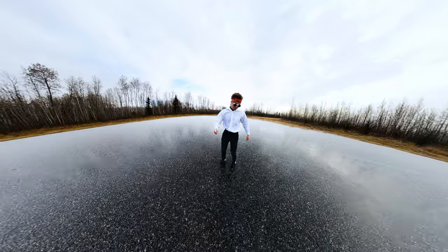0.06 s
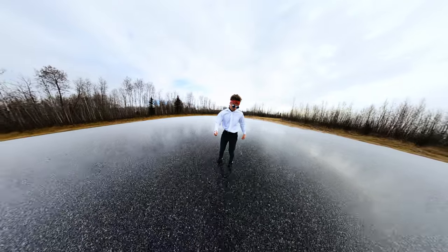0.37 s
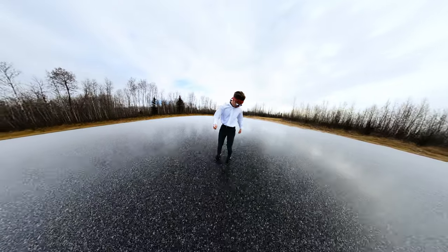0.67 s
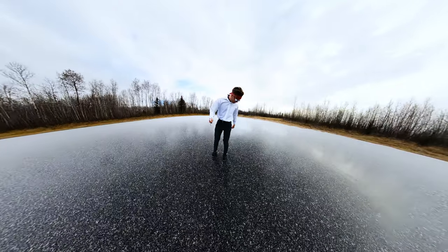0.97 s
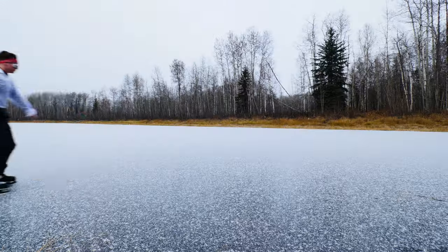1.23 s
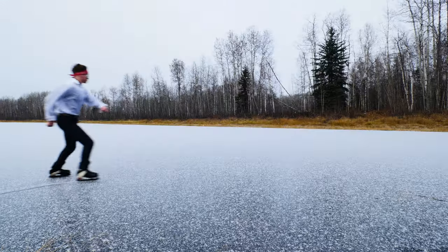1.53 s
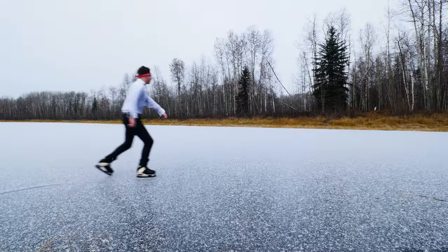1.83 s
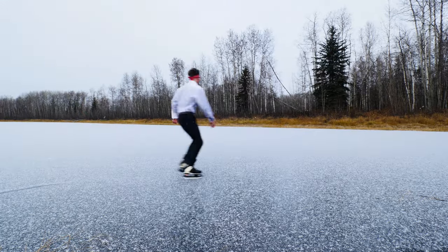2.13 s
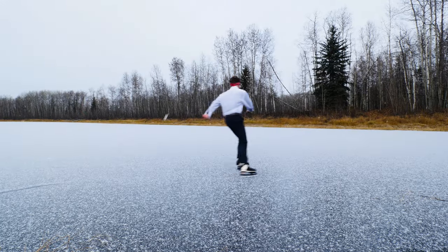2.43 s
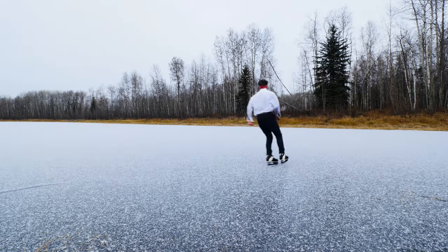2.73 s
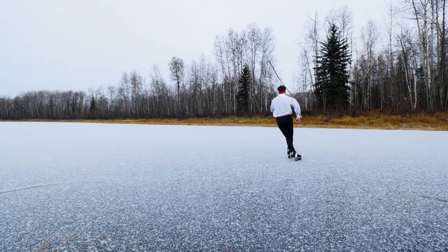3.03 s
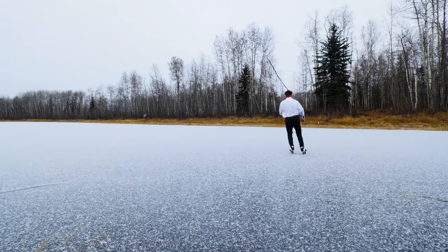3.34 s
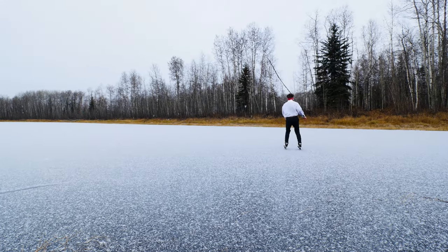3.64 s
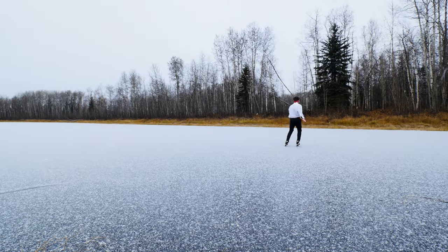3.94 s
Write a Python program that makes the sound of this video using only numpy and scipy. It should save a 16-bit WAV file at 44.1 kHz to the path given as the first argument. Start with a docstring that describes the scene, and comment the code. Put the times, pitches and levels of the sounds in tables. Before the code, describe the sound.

Ice skates scrape and tick sharply on a frozen lake, heard just above the blades. Then, from ice level, the skater passes left to right, the thin ice answering with falling chirps and low thuds over light wind.

```python
"""Sharp ticks and scraping of skates on thin lake ice, from just above the blades (mono); then, heard from
the ice, the skater passes left to right. Each tiny crack under a blade runs through the sheet, treble
first, and arrives as a falling chirp that settles on the ice's own note: the farther, the longer the glide.
Strokes add crack swarms and scrape; low thuds in the ice, light wind and a faint hum lie beneath."""
import sys
import numpy as np
from scipy import signal
from scipy.fft import rfft, irfft, next_fast_len
from scipy.io import wavfile
from scipy.ndimage import map_coordinates

SR = 44100
rng = np.random.default_rng(int(sys.argv[2]) if len(sys.argv) > 2 else 0)


def bounce(signal):
    """Save signal as a 16-bit WAV file at the path given by the first command-line argument."""
    frames = np.transpose(np.atleast_2d(signal))
    limited = np.clip(frames, -1, 1)
    pcm = np.round(limited * 32767).astype(np.int16)
    wavfile.write(sys.argv[1], SR, pcm)


N = 176400
TIME = np.arange(N) / SR

# close cracks: t/s, level/dB, glide/ms
CLOSE_CRACKS = [(0.0295, 1, 0.6), (0.128, -16, 1.6), (0.141, -20, 3.1), (0.172, -17.5, 2.8),
                (0.199, -13, 2.2), (0.2201, -1, 0.39), (0.289, -11, .6), (0.301, -7.5, 0.62),
                (0.3174, -6.5, 0.35), (0.3276, -11, 0.71), (.3358, -21, 1.2), (0.358, -10.5, 0.68),
                (0.3876, -11, 3.1), (0.403, -16, 1.8), (0.4146, -14.5, 1.3), (0.4318, -15, 1.3),
                (0.4412, -20, 3.2), (0.468, -18.5, 2.8), (.479, -18, 2.4), (0.5052, -2, 0.55),
                (0.622, -20, 5.6), (0.6608, -6, 0.85), (0.695, -3, 0.38), (.782, -11, 1.65),
                (0.8419, -3, 0.95), (.939, -6.5, 0.26), (0.96, -7.5, 0.21), (.972, -20, 1),
                (.988, -18, 1.3), (1.009, -1, 0.63), (1.0221, -4, 0.56), (1.0313, -1.5, 0.28)]
# close strokes: t/s, length/s, level/dB, fade/(dB/s)
CLOSE_STROKES = [(0.213, 0.087, -27.5, 17), (0.321, 0.091, -36.5, 55), (0.504, 0.072, -30.5, 64),
                 (0.657, 0.011, -22.5, 250), (0.686, 0.15, -31, 29), (0.838, 0.01, -24, 200),
                 (0.996, 0.12, -27, 37)]
# close blade scrape: f/Hz, level/dB
CLOSE_SCRAPE_EQ = [(300, -57), (800, -19), (1300, -1), (2200, -0.5), (3500, -4.5), (5500, -2.5), (7500, -5),
                   (9500, -17), (12000, -27.5), (15500, -46)]
# wind on the carried microphone: f/Hz, level/dB
RUMBLE_EQ = [(12, 0.5), (27, -4), (45, -12), (80, -29), (200, -55), (600, -90)]
# wind in the shore trees: f/Hz, level/dB
TREES_EQ = [(25, -55), (60, -39), (110, -7), (175, 0), (240, -1.5), (500, -8), (1000, -4.5), (4000, -29.5),
            (15000, -38)]
# low thuds in the ice: t/s, level/dB
THUDS = [(0.219, -34), (0.295, -24), (0.541, -30), (1.104, -27.5), (1.239, -27), (1.643, -29), (1.905, -29),
         (2.026, -30), (2.129, -30), (2.159, -28), (2.313, -22.5), (2.384, -31), (2.956, -24),
         (3.151, -23.5), (3.353, -29), (3.411, -20.5), (3.798, -35), (3.881, -29)]
# low thud in the ice: f/Hz, level/dB
THUD_EQ = [(50, -64), (120, -15), (220, -0.5), (380, -1), (600, -8.5), (900, -1), (1500, -25), (12000, -50)]
# skater's path: t/s, distance/m, left minus right/dB
PATH = [(1.14, 8.3, 13), (1.5, 12.8, 12), (1.84, 11.2, 9.5), (1.91, 5, 10), (2.08, 6.7, 6.5),
        (2.22, 2.75, -3.5), (2.32, 5.3, 0.5), (2.42, 6.1, -13), (2.68, 10.53, -10.5), (3.14, 12.8, -19.5),
        (3.42, 11.95, -14), (3.72, 12, -5), (3.88, 16.5, -12.5)]
# cracks of the pass: t/s, level/dB
PASS_CRACKS = [(1.186, -21), (1.203, -16.5), (1.234, -13), (1.268, -23), (1.287, -24), (1.302, -22),
               (1.329, -18), (1.344, -24), (1.363, -17), (1.388, -18), (1.416, -17), (1.426, -18),
               (1.448, -22), (1.459, -16), (1.472, -21), (1.49, -19.5), (1.506, -18), (1.523, -20),
               (1.563, -19.5), (1.6, -17.5), (1.611, -18.5), (1.629, -21), (1.653, -23), (1.705, -20.5),
               (1.745, -20.5), (1.767, -20), (1.791, -22), (1.857, -17.5), (1.898, 1), (1.962, -17),
               (1.978, -14.5), (2.043, -14), (2.087, -16), (2.122, -16.5), (2.2108, -9), (2.2406, -11),
               (2.288, -9.5), (2.3068, -3), (2.319, -6), (2.345, -9.5), (2.386, -16), (2.401, -13),
               (2.413, -11), (2.457, -7.5), (2.498, -10.5), (2.505, -12), (2.545, -21), (2.693, -19.5),
               (2.713, -20), (2.757, -22), (2.774, -23.5), (2.821, -23.5), (2.927, -20.5), (2.953, -17),
               (2.988, -19.5), (3.023, -22.5), (3.044, -22), (3.078, -22), (3.101, -24), (3.1415, -0.5),
               (3.187, -18), (3.216, -14.5), (3.238, -19), (3.279, -13), (3.342, -18), (3.403, -2),
               (3.471, -15), (3.53, -20), (3.568, -24), (3.589, -21.5), (3.614, -22), (3.641, -20.5),
               (3.696, -19.5), (3.719, -18.5), (3.867, -0.5), (3.918, -17), (3.985, -20)]
# strokes of the pass: t/s, length/s, swarm/dB, scrape/dB, fade/(dB/s)
PASS_STROKES = [(1.158, 0.16, -28.5, -39.5, 4), (1.916, 0.22, -28.5, -28.5, 24),
                (2.302, 0.18, -12.5, -19, 82), (2.487, 0.13, -30, -31.5, 64), (3.145, 0.073, -11, -24, 122),
                (3.339, 0.12, -18.5, -28, 31), (3.546, 0.26, -32, -46, 3), (3.861, 0.18, -21.5, -28.5, 5)]
# gliding blades: t/s, hiss/dB, swarm/dB
GLIDING = [(1.14, -33, -23.5), (1.38, -41.5, -35.5), (1.62, -36, -32), (1.83, -38, -50), (1.895, -28, -28),
           (2.24, -39.5, -34.5), (2.4, -35, -31), (2.66, -46.5, -35.5), (2.88, -45, -39),
           (3.1, -46.5, -37.5), (3.45, -41.5, -26.5), (3.82, -49.5, -59), (4, -46, -26)]
# singing sheet: f/Hz, level/dB
SINGING_EQ = [(700, -21), (980, -0.5), (1100, 8.5), (1250, -11), (2000, -5), (4500, -32)]
# passing blade scrape: f/Hz, level/dB
PASS_SCRAPE_EQ = [(150, -30), (350, -1.5), (700, 5), (1200, 5), (2000, 3), (3500, 0), (4700, -17.5),
                  (6200, -7), (8000, -18), (10000, -13), (12500, -17), (15500, -36)]
# gliding hiss: f/Hz, level/dB
HISS_EQ = [(500, -4), (1500, 6.5), (3200, 0.5), (4800, -8), (6500, -2.5), (8000, -6.5), (10000, 0),
           (12500, -6.5), (15500, -21)]
# ice spray from a biting edge: t/s, length/s, level/dB, fade/(dB/s)
SPRAYS = [(1.136, 0.17, -40, 50), (2.304, 0.44, -35.5, 56)]
# ice chips flicked off the blades: t/s, level/dB
CHIPS = [(1.6165, -22), (1.734, -22), (2.1096, -17), (1.898, -10), (2.305, -6.5), (2.453, -19),
         (2.954, -23)]

ICE_NOTE_HZ, CLOSE_NOTE_HZ, BLADE_HZ = 1064, 1261, 9720
GLIDE_MS_PER_M, SWELL_PER_M, NEAR_M = 1.042, 0.035, 1.8
ONSET_HZ, SWEEP_POWER, NOTE_SAG = 9020, 0.6044, 0.041
PASS_START_S, TOP_HZ = 1.137, 15700


def amp(db):
    """dB to gain."""
    return 10 ** (np.asarray(db) / 20)


def unit(x):
    """Scale to rms 1."""
    return x / np.sqrt(np.mean(x ** 2) + 1e-20)


def curve(rows, column):
    """Table column, interpolated per sample."""
    rows = np.array(rows)
    return np.interp(TIME, rows[:, 0], rows[:, column])


def filtered(x, response):
    """Apply the gain response(hz)."""
    size = next_fast_len(N + 8192)
    return irfft(rfft(x, size) * response(np.fft.rfftfreq(size, 1 / SR)), size)[..., :N]


def coloured(x, eq):
    """Apply an EQ table; rms 1."""
    knots_hz, db = np.transpose(eq)
    return unit(filtered(x, lambda hz: amp(np.interp(np.log(hz + 1), np.log(knots_hz + 1), db))))


def ring(x, centre_hz, half_width_hz):
    """One resonance; rms 1."""
    return unit(filtered(x, lambda hz: 1 / (1 + ((hz - centre_hz) / half_width_hz) ** 2)))


def wobble(rate_hz):
    """Smooth random curve, knots at rate_hz."""
    return map_coordinates(rng.standard_normal(int(N * rate_hz / SR) + 4), [TIME * rate_hz])


def noise(shared):
    """Stereo white noise; shared: power fraction common to both sides."""
    return np.sqrt(shared) * rng.standard_normal(N) + np.sqrt(1 - shared) * rng.standard_normal((2, N))


def pan(db):
    """Constant-power gains for left minus right in dB."""
    gains = amp(np.array([db, -db]) / 2).reshape(2, -1)
    return gains / np.sqrt(np.mean(gains ** 2, axis=0))


def add(out, t_s, sound):
    """Mix in at t_s."""
    i = int(np.clip(round(t_s * SR), 0, N))
    out[..., i:i + sound.shape[-1]] += sound[..., :N - i]


def chirp(glide_ms, note_hz, swell=0.58, crest=0.51, fade=0.39, end=1.145):
    """Crack dispersed by the ice: complex sweep falling to the note. crest, fade, end in glide lengths."""
    glide_samples = glide_ms * SR / 1000
    progress = np.arange(int(end * glide_samples) + 2) / glide_samples
    fall = np.minimum(progress / 0.8, 1)
    onset = (note_hz / ONSET_HZ) ** (1 / SWEEP_POWER)
    hz = note_hz * (1 + NOTE_SAG * (1 - progress)) / (fall * (2 - fall) + onset) ** SWEEP_POWER
    rise = np.minimum(progress / crest, 1) ** swell
    tail = np.sin(np.pi / 2 * np.clip((end - progress) / fade, 0, 1)) ** 2
    return rise * tail * np.exp(2j * np.pi * np.cumsum(hz) / SR)


def swarm(count, glide_ms, note_hz, scatter_db, spread_rad=0):
    """Small cracks at an uneven stick-slip pace; stereo, rms 1."""
    out = np.zeros((2, N))
    glide_ms, note_hz = np.broadcast_to(glide_ms, N), np.broadcast_to(note_hz, N)
    times_s = (np.arange(count) + rng.random(count)) / count * N / SR
    draws = np.clip(rng.standard_normal((count, 4)), -2, 2)
    for t_s, (size, stretch, turn, side) in zip(times_s, draws):
        i = int(t_s * SR)
        wave = chirp(glide_ms[i] * np.exp(0.1283 * stretch), note_hz[i])
        phase_rad = np.pi * turn + spread_rad * np.array([[side], [-side]])
        add(out, t_s, amp(scatter_db * size) * (wave * np.exp(1j * phase_rad)).real)
    return unit(out)


def stroke(start_s, length_s, fade_db_per_s, attack_s=0.00092, release_s=0.02):
    """Blade pressure: quick bite, steady fade, lift."""
    t = np.maximum(TIME - start_s, 0)
    bite = 1 - np.exp(-t / attack_s)
    lift = np.exp(-np.maximum(t - length_s, 0) / release_s)
    return bite * amp(-fade_db_per_s * np.minimum(t, length_s)) * lift


def close_cracks():
    """Cracks barely dispersed: sharp ticks, each with a short tail of spray."""
    cracks = np.zeros(N)
    for t_s, db, glide_ms in CLOSE_CRACKS:
        note_hz = CLOSE_NOTE_HZ * (1 + 0.96 / glide_ms)
        wave = chirp(glide_ms, note_hz, swell=0.15, crest=0.43, fade=0.53, end=0.86)
        add(cracks, t_s, amp(db) * (wave * np.exp(2j * np.pi * rng.random())).real)
    cracks = filtered(cracks, lambda hz: 1 / (1 + (hz / 8900) ** 4))
    t = TIME[:SR // 20]
    tail = rng.standard_normal(len(t)) * amp(-60 * t / 0.019)
    spray = coloured(signal.fftconvolve(cracks, tail)[:N], CLOSE_SCRAPE_EQ)
    return cracks + amp(-9) * np.std(cracks) * spray


def close_blades():
    """Gritty scrape following blade pressure, over steady swarms of tiny cracks."""
    strokes = sum(amp(db) * stroke(t_s, length_s, fade, attack_s=0.00077, release_s=0.0084)
                  for t_s, length_s, db, fade in CLOSE_STROKES)
    grit = rng.standard_normal(N) * amp(9 * np.tanh(wobble(1500)) + 3.5 * np.tanh(wobble(400)))
    scrape = (amp(-42) + strokes) * coloured(grit, CLOSE_SCRAPE_EQ)
    ticks = swarm(count=480, glide_ms=0.39, note_hz=2650, scatter_db=6)[0]
    chirps = swarm(count=450, glide_ms=5.27, note_hz=CLOSE_NOTE_HZ, scatter_db=2)[0]
    return scrape + amp(-38) * coloured(ticks, CLOSE_SCRAPE_EQ) + amp(-39) * chirps


def wind_rumble():
    """Wind buffeting the carried microphone."""
    return amp(-46 + 2.1 * wobble(6.2)) * coloured(rng.standard_normal(N), RUMBLE_EQ)


def tree_wind():
    """Light wind in the shore trees."""
    return amp(-42 + 3.5 * wobble(6.707)) * coloured(noise(shared=1), TREES_EQ)


def ice_thuds(t60_s):
    """Dull low thuds running through the sheet."""
    envelope, t = np.zeros(N), TIME[:SR // 4]
    for t_s, db in THUDS:
        add(envelope, t_s, amp(db - 60 * t / t60_s) * (1 - np.exp(-t / 0.00058)))
    return envelope * coloured(noise(shared=0.96), THUD_EQ)


def passing_cracks():
    """Cracks and swarms: short and bright nearby, long and pure far off. The sheet sings between them."""
    cracks = np.zeros((2, N))
    distance_m, side_db = curve(PATH, 1), curve(PATH, 2)
    glide_ms = GLIDE_MS_PER_M * distance_m
    note_hz = ICE_NOTE_HZ * (1 + (NEAR_M / distance_m) ** 2)  # near cracks end above the note
    for t_s, db in PASS_CRACKS:
        i = int(t_s * SR)
        turn, side = rng.standard_normal(2)
        wave = chirp(glide_ms[i], note_hz[i], swell=SWELL_PER_M * distance_m[i])
        phase_rad = np.pi * turn + 0.9 * np.tanh([[side], [-side]])
        add(cracks, t_s, amp(db) * (wave * np.exp(1j * phase_rad)).real)
    strokes = sum(amp(db) * stroke(t_s, length_s, fade) for t_s, length_s, db, _, fade in PASS_STROKES)
    pressure = amp(curve(GLIDING, 2)) + strokes
    cracks += pressure * swarm(900, glide_ms, note_hz, scatter_db=5, spread_rad=0.84)
    cracks = filtered(cracks, lambda hz: hz ** 2 / (hz ** 2 + 200 ** 2))
    singing = pressure * distance_m / distance_m.max() * coloured(noise(shared=0.36), SINGING_EQ)
    return cracks * pan(side_db) + amp(-9) * singing * pan(0.5 * side_db)


def passing_blades():
    """Airborne scrape of each stroke and hiss of gliding steel."""
    pressure = sum(amp(db) * stroke(t_s, length_s, fade) for t_s, length_s, _, db, fade in PASS_STROKES)
    coarse_grit = noise(shared=0.95) * amp(5.8 * wobble(900) + 4.8 * wobble(120))
    hiss_db = curve(GLIDING, 1) + 2.8 * wobble(30.1)
    fine_grit = noise(shared=0.17) * amp(4.55 * wobble(840))
    return pressure * coloured(coarse_grit, PASS_SCRAPE_EQ) + amp(hiss_db) * coloured(fine_grit, HISS_EQ)


def ice_spray():
    """Spray from a biting edge rings the steel."""
    flow = sum(amp(db) * stroke(t_s, length_s, fade) for t_s, length_s, db, fade in SPRAYS)
    return flow * ring(noise(shared=0.79), BLADE_HZ, half_width_hz=750)


def distant_hum():
    """Faint hum: narrowband noise."""
    return amp(-57) * ring(rng.standard_normal(N), centre_hz=180, half_width_hz=4.5)


def ice_chips():
    """Flicked chips ring the steel briefly."""
    hits = np.zeros(N)
    for t_s, db in CHIPS:
        add(hits, t_s, amp(db - 60 * TIME[:SR // 20] / 0.011))
    return hits * ring(noise(shared=0.52), BLADE_HZ, half_width_hz=2300)


def scene():
    """Mono close view, then a cut to the stereo pass."""
    wind, hum = tree_wind(), distant_hum()
    close = close_cracks() + close_blades() + wind_rumble()
    close += (ice_thuds(t60_s=0.039) + amp(-8) * wind).mean(axis=0)
    passing = passing_cracks()
    passing += (passing_blades() + ice_spray() + ice_chips()) * pan(0.17 * curve(PATH, 2))
    passing += (ice_thuds(t60_s=0.12) + wind + hum) * pan(-2.1)
    crossfade = np.clip((TIME - PASS_START_S) / 0.0018, 0, 1)
    return (1 - crossfade) * close + crossfade * passing


def record(dry):
    """Clip the loudest cracks, then low-pass steeply."""
    return filtered(np.clip(dry, -1, 1), lambda hz: 1 / (1 + (hz / TOP_HZ) ** 120))


dry = scene()
out = record(dry)
bounce(out)
```